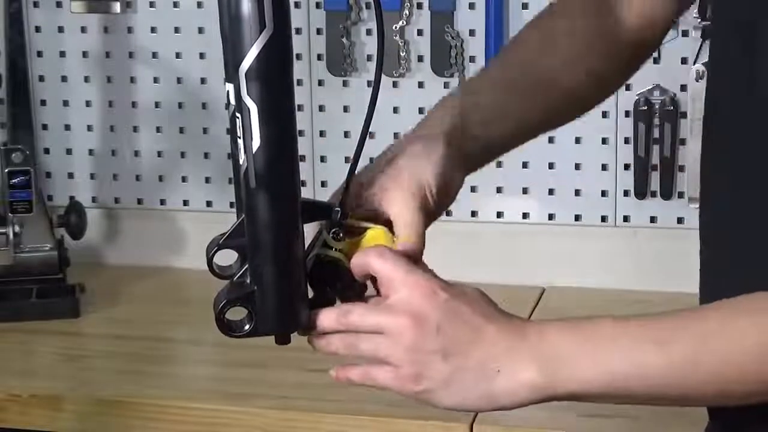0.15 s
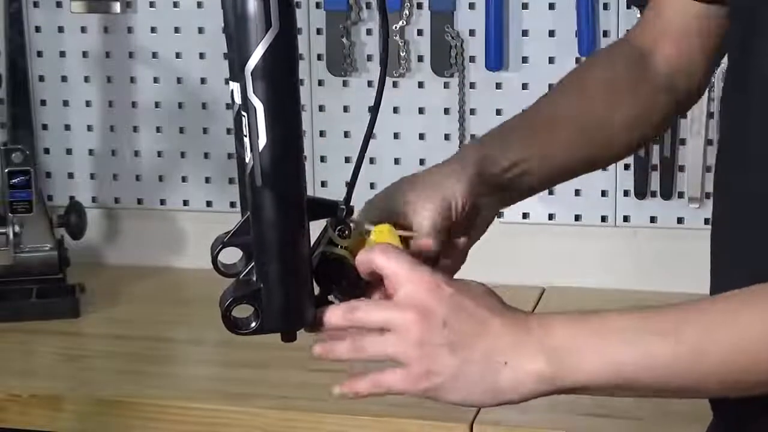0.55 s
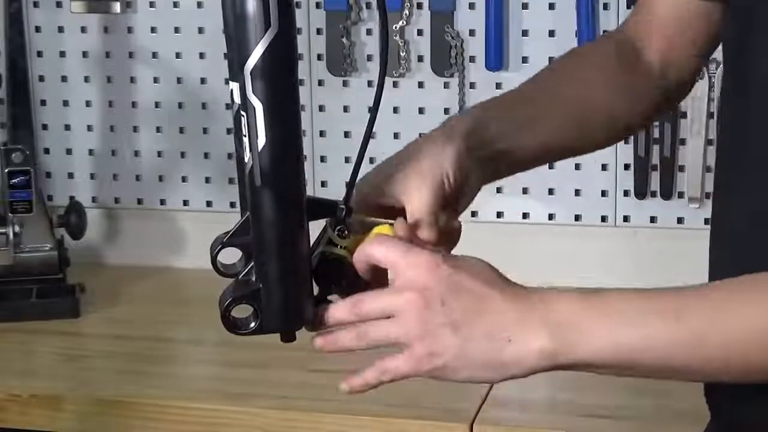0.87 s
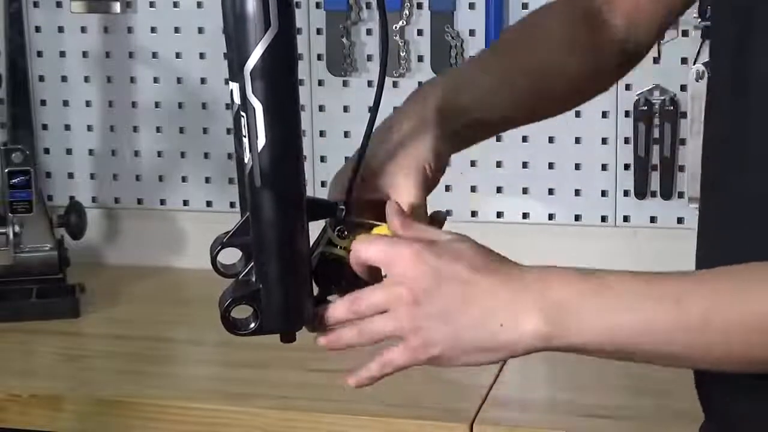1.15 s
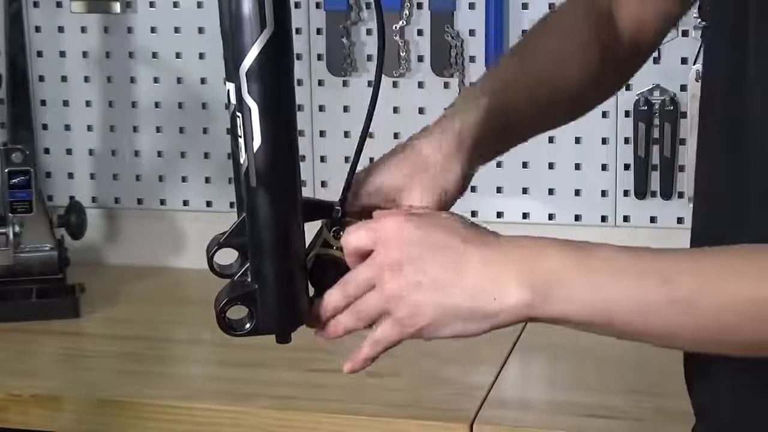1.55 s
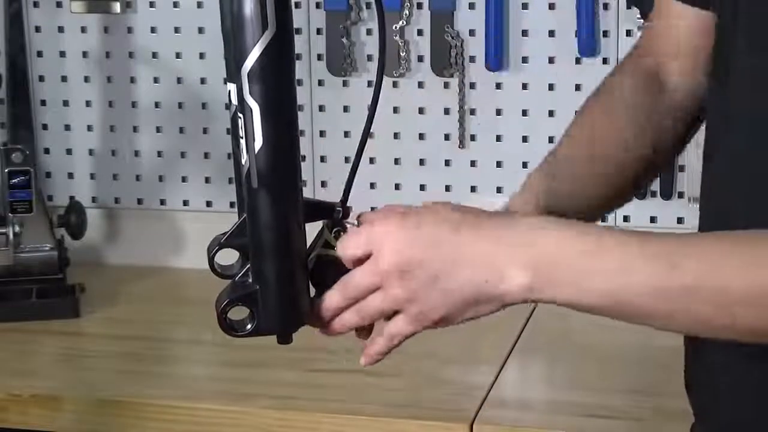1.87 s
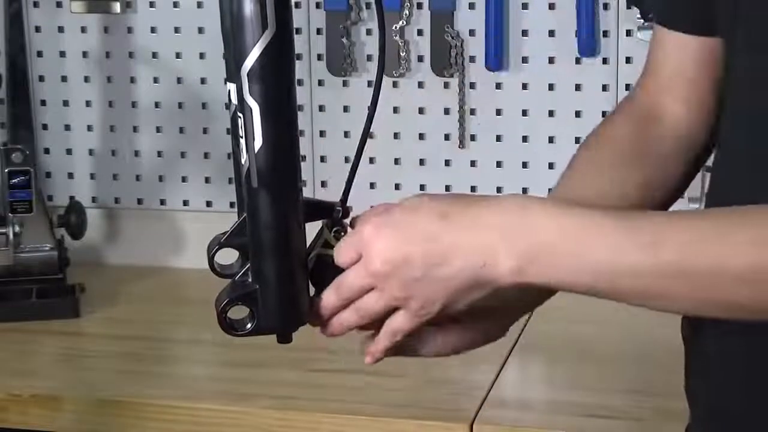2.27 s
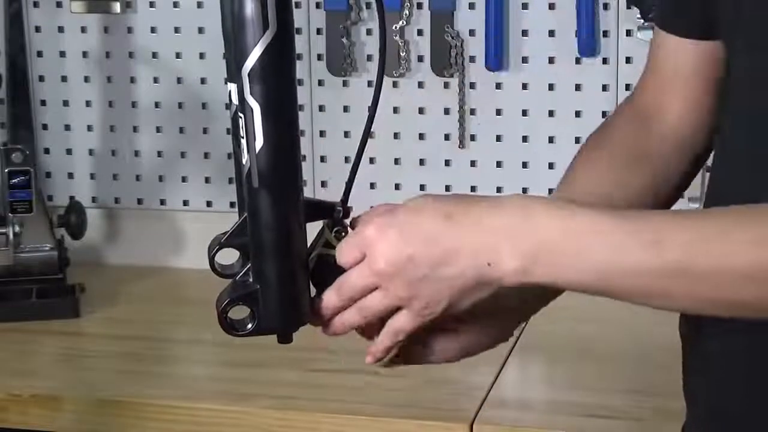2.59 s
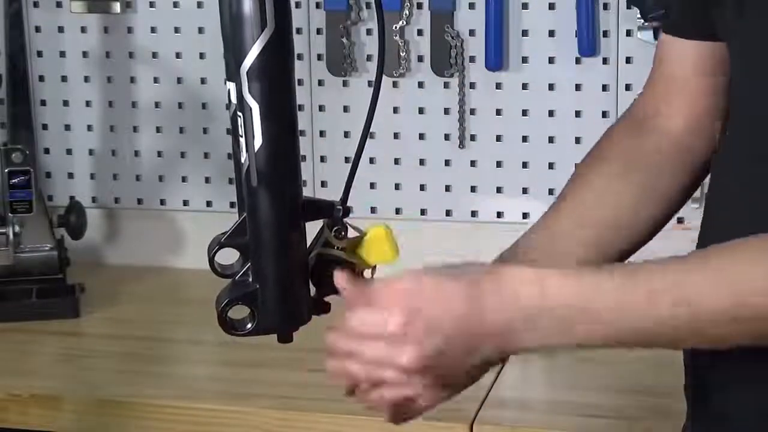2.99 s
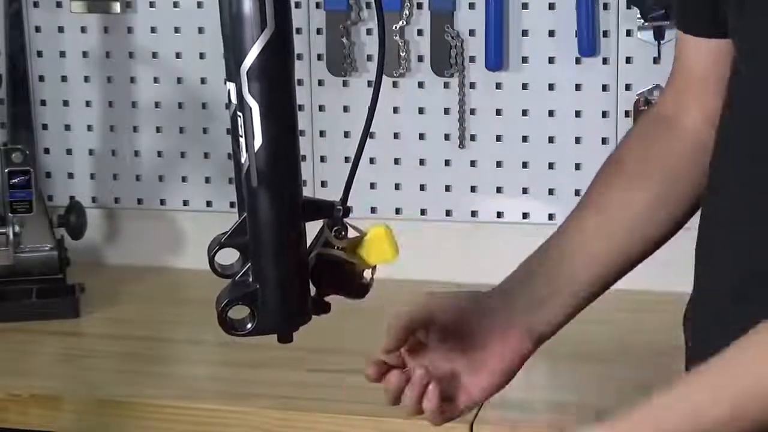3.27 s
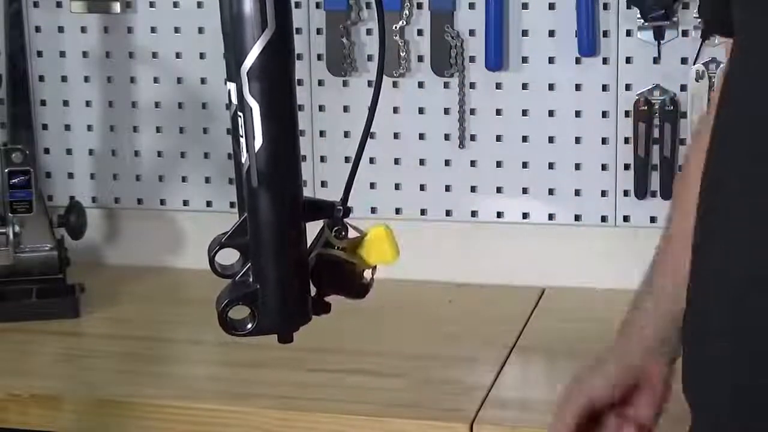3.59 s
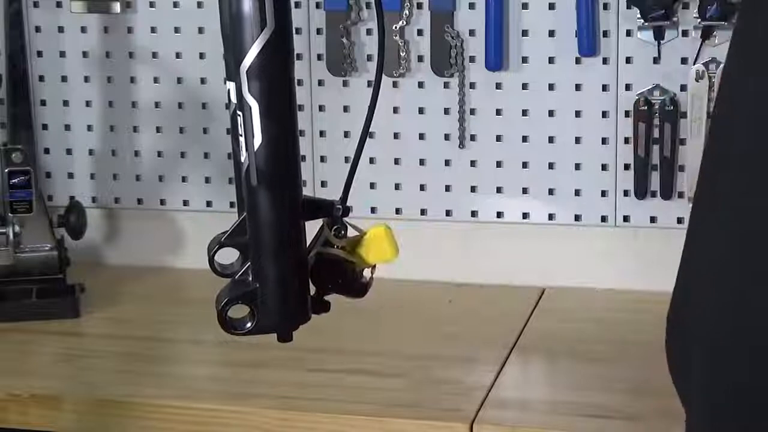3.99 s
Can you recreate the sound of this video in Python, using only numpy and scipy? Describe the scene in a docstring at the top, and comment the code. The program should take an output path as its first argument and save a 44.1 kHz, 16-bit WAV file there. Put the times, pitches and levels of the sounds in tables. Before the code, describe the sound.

Stretched rubber band snaps sharply against a bicycle brake caliper in a bare echoing workshop, with faint rubbing, then a dull footstep and clothing swish.

```python
"""A bare, echoing workshop, heard through a camera's two microphones.
A rubber band stretched round a plastic block on a bicycle brake caliper is pushed along by fingers:
it rasps, snaps and rebounds, each blow ringing the damped modes of block and caliper.
Late on, two faint whistles glide, a foot steps with a short squeak, and clothing swishes.
Under it lie filtered room noise, a low boom, a mains hum and the camera's ticks, hiss and thin whine."""
import sys
import numpy as np
from scipy import signal
from scipy.fft import rfft, irfft, next_fast_len
from scipy.io import wavfile
from scipy.ndimage import uniform_filter1d

SR = 44100
rng = np.random.default_rng(int(sys.argv[2]) if len(sys.argv) > 2 else 0)


def wav_out(sig):
    """Save sig, one row per channel (or a flat mono array), as 16-bit PCM at SR to the path in sys.argv[1]."""
    wavfile.write(sys.argv[1], SR, np.round(np.clip(np.atleast_2d(sig).T, -1, 1) * 32767).astype(np.int16))


N = 182441
TAPS = 4096  # length of one ring or blow, samples
EDGE_HZ = 11020  # upper band limit of the recorder

# snaps and slips of the band, and three faint dull ticks of the camera (0.941, 1.3596, 3.94):
# start_s, strength_db, brightness (dB per octave), room_send_db, place struck (lends the ticks its tone)
SNAPS = [ (0.2113, -13.5, 1.5, 3.5, "rim"), (0.2730, -5, -1.5, 3, "rim"), (0.6057, 0.5, -1.2, 5, "block"),
         (0.941, -28.5, -6, 3.5, "block"), (1.3596, -39, -8.5, -6, "block"),
         (1.9877, -26.5, -8.5, 3, "block"), (2.3568, -27, -4, 5.5, "rim"), (2.39, 2.5, 1, 4, "caliper"),
         (2.7739, -18, 9.5, 7, "underside"), (2.8204, -11.5, 7.5, -3, "underside"),
         (2.831, -14.5, -3, 6, "underside"), (2.9220, -13.5, 2, 2.5, "rim"),
         (3.94, -31, -8.5, -14, "block"), ]
# delay of the single bounce, and its level under the snap on most places and on bare metal
REBOUND_S, REBOUND_DB, METAL_REBOUND_DB = .0055, -14, -5.5


def snaps_and_dull_ticks(spread_s=0.001424):
    """The band strikes and rebounds once, harder off singing bare metal; dull camera ticks share the ring."""
    out = np.zeros((2, N))
    hz = np.fft.rfftfreq(TAPS, 1 / SR)
    # the blow travels through the parts, and its treble leaves last
    lag_s = spread_s * np.minimum(hz / EDGE_HZ, 1)
    dispersion = np.exp(-2j * np.pi * np.cumsum(lag_s) * SR / TAPS)
    for s, db, bright_db, send_db, place in SNAPS:
        blow = irfft(rfft(strike(place, bright_db)) * dispersion)
        click = gain_of(db) * blow
        on_metal = place == "caliper"
        rebound_db = METAL_REBOUND_DB if on_metal else REBOUND_DB
        add(out, s, in_room(click, send_db))
        add(out, s + REBOUND_S, gain_of(rebound_db) * in_room(click, send_db))
        if on_metal:
            add(out, s, gain_of(db) * singing())
    return out


# resonances of block and caliper; how strongly each rings depends on the place struck:
# pitch_hz, half_width_hz, then relative level_db at rim, block, caliper, underside
BRAKE_MODES = [ (540, 75, -5.5, -12, -14, -10), (957, 295, -7.5, -20, -16, -3),
               (1327, 113, 5, -12, -32, 4.5), (1680, 183, -17, -18.5, -9, -5.5),
               (2130, 300, 3.5, -15, -9.5, 5), (2660, 240, 1, -3, -18, 2), (3320, 560, 2, -37, -13, 1),
               (4127, 390, 5.5, -5, -11.5, -3.5), (4724, 214, 2, -6, -2, 0.5),
               (5130, 160, 6.5, -1.5, -4, -14), (5824, 640, 3.5, 1, -15.5, 0.5),
               (6060, 170, -9, -0.5, -11, -25), (6750, 210, -20, -8, 4, -1), (7240, 77, -3, -26, -0.5, 0),
               (8000, 470, -8, -6.5, -9, -4.5), (8850, 290, 2, -4, -13, -10), (9450, 370, -16, 3, -8.5, -3),
               (11800, 2900, -10.5, -12.5, -10, -6.5), ]
# names of the places struck, in the order of those level columns
PLACES = ["rim", "block", "caliper", "underside"]


def strike(place, bright_db):
    """The short ring of block and caliper when struck at one place; a sharper blow is brighter."""
    hz = np.fft.rfftfreq(TAPS, 1 / SR)
    octaves = np.log2(np.maximum(hz, 400) / 5000)  # the tilt pivots at 5 kHz
    column = PLACES.index(place)
    modes = [(f, width, levels_db[column]) for f, width, *levels_db in BRAKE_MODES]
    return ring(resonances(modes, hz) * gain_of(bright_db * octaves))


# lingering tones of the caliper's metal: pitch_hz, level_db relative to the blow, t60_s
SINGING = [(1695, -58, 1.2), (4880, -50, 0.91), (6738, -41, 0.96), (6550, -46, 0.78), (7200, -56, 0.51),
           (7600, -57, 0.39), (7412, -52, .5)]


def singing():
    """Thin, slowly dying tones of the caliper's metal after a blow on it."""
    t = np.arange(SR) / SR
    return sum(gain_of(db - 60 * t / t60) * np.sin(2 * np.pi * hz * t) for hz, db, t60 in SINGING)


# bursts of tiny slips as the band drags over an edge:
# start_s, length_s, strength_db, brightness (dB per octave)
RASPS = [(1.656, 0.02, -27, 3), (1.98, 0.015, -24, -3), (2.02, .045, -32.5, -7), (2.810, 0.02, -10.5, 2)]


def rasps(slips_per_s=2500, send_db=1):
    """Stretched rubber sticks and slips along the caliper's underside, each slip striking its modes."""
    out = np.zeros((2, N))
    t = np.arange(TAPS) / SR
    for s, length_s, db, bright_db in RASPS:
        slips = rng.standard_normal(TAPS) * (rng.random(TAPS) < slips_per_s / SR)
        swell = np.sin(np.pi * np.minimum(t / length_s, 1))
        slips *= np.sqrt(np.maximum(swell, 0))
        slips /= np.linalg.norm(slips) + 1e-9
        sound = signal.fftconvolve(slips, strike("underside", bright_db))
        add(out, s, gain_of(db) * in_room(sound, send_db))
    return out


# fingers pushing the band along: time_s of the hardest push, level_db
PUSHES = [(.83, -62), (2.1, -61), (2.87, -57.5)]
PUSH_RISE_DB_PER_S, PUSH_FALL_DB_PER_S = 27, 31
HOLD_DB = -63  # rubbing of the fingers between pushes
# tone of skin rubbing on rubber and plastic: pitch_hz, relative level_db (per Hz)
SKIN = [(40, 0), (100, -7.5), (220, 4.5), (500, 3.5), (1200, -1), (3000, -7.5), (11000, -59)]


def grip():
    """Strength of the fingers' rubbing: a steady hold, and a swell that builds and relaxes per push."""
    t = np.arange(N) / SR
    power = gain_of(HOLD_DB) ** 2
    for s, db in PUSHES:
        fade_db = np.maximum(PUSH_RISE_DB_PER_S * (s - t), PUSH_FALL_DB_PER_S * (t - s))
        power = power + gain_of(db - fade_db) ** 2
    return np.sqrt(power)


def friction(stroke, spectrum, grain_db):
    """Rubbing noise that catches and slides unevenly under a stroke."""
    catches = evened(uniform_filter1d(rng.standard_normal(N), size=200))
    return stroke * evened(hiss(spectrum) * gain_of(grain_db * catches))


# hands bumping softly against the fork: start_s, strength_db
BUMPS = [(2.152, -30), (2.225, -30), (2.255, -28)]
# the fork's dull resonance: pitch_hz, half_width_hz, relative level_db
BUMP_MODES = [(177, 51.6, 0)]
# the floor under the foot: pitch_hz, half_width_hz, relative level_db
STEP_MODES = [(275, 40, 0.5), (353, 117, 0), (428, 50, -3.2), (560, 110, -12)]


def knocks(rows, modes, room_db):
    """Soft blows on a heavily damped body, each ringing its low modes."""
    out = np.zeros((2, N))
    knock = ring(resonances(modes, np.fft.rfftfreq(TAPS, 1 / SR)))
    for s, db in rows:
        add(out, s, gain_of(db) * in_room(knock, room_db))
    return out


# one dull step: start, length of the roll, level midway, and level of its ends relative to that
STEP_S, STEP_ROLL_S, STEP_DB, STEP_ENDS_DB = 3.707, .056, -23, -3


def foot_roll(count=5, jitter_s=0.001):
    """The foot rolls from heel to sole in a quick run of knocks, heaviest midway: start_s, level_db."""
    roll = np.linspace(0, 1, count)
    times = STEP_S + STEP_ROLL_S * roll + jitter_s * rng.standard_normal(count)
    return zip(times, STEP_DB + STEP_ENDS_DB * (2 * roll - 1) ** 2)


# squeak of the sole: middle_s, half_length_s, pitch_hz, peak level_db
SQUEAK = (3.913, .012, 1030, -50)


def squeak():
    """The sole sticks and slips: one short sine under a bell-shaped swell."""
    s, half_s, pitch_hz, db = SQUEAK
    out = np.zeros((2, N))
    t = np.arange(-TAPS / 2, TAPS / 2) / SR
    swell = np.exp(-(t / half_s) ** 2)
    tone = in_room(swell * np.sin(2 * np.pi * pitch_hz * t), send_db=-4)
    add(out, s + t[0], gain_of(db) * tone / abs(tone).max())
    return out


# sleeves and trousers stir faintly all the time and brush once with the step
STIR_DB = -66
SWISH_S, SWISH_HOLD_S, SWISH_DB = 3.815, 0.039, -50.5
SWISH_RISE_DB_PER_S, SWISH_FALL_DB_PER_S = 183, 38
# tone of the cloth: pitch_hz, relative level_db (per Hz)
CLOTH = [(100, -56), (300, 6), (700, 6), (1300, 2.5), (2200, 3.5), (3500, 1), (5000, 1.5), (6800, 3.5),
         (9000, 2), (11000, -1)]


def swish():
    """Strength of the cloth's brushing: a faint stir, and one stroke that rises fast, holds and dies."""
    t = np.arange(N) / SR - SWISH_S
    rise_db = SWISH_RISE_DB_PER_S * np.maximum(-t, 0)
    fall_db = SWISH_FALL_DB_PER_S * np.maximum(t - SWISH_HOLD_S, 0)
    return np.hypot(gain_of(STIR_DB), gain_of(SWISH_DB - rise_db - fall_db))


# two thin whistles around the step: time_s of the highest pitch, highest pitch_hz, level_db
WHISTLES = [(3.71, 8950, -72), (3.65, 10330, -69.5)]
# their loudest moment, half length, drop in pitch one half length from the top, and unsteadiness
WHISTLE_S, WHISTLE_HALF_S, WHISTLE_SAG_HZ, WHISTLE_WAVER_HZ = 3.62, .14, 500, 50


def whistles(flutter_db=4):
    """Faint sines that swell, flutter and fade while their wavering pitch arches."""
    t = np.arange(N) / SR
    out = np.zeros(N)
    for s, top_hz, db in WHISTLES:
        slow = uniform_filter1d(rng.standard_normal((2, N)), size=600)
        flutter, waver = evened(uniform_filter1d(slow, size=300))
        sag_hz = WHISTLE_SAG_HZ * ((t - s) / WHISTLE_HALF_S) ** 2
        hz = np.maximum(top_hz - sag_hz + WHISTLE_WAVER_HZ * waver, 0)
        out += gain_of(db + flutter_db * flutter) * np.sin(2 * np.pi * np.cumsum(hz) / SR)
    return out * np.exp(-((t - WHISTLE_S) / WHISTLE_HALF_S) ** 2)


# the camera's mechanism, close to the microphones: pitch_hz, half_width_hz, relative level_db
TICK_MODES = [(2490, 85, -5.5), (2880, 68, -9.5)]
TICK_START_S, TICK_PERIOD_S, TICK_DB = .0325, .04, -42
# a soft broad hiss near 4.2 kHz and one thin whine at 7.6 kHz: pitch_hz, half_width_hz, relative level_db
CAMERA_NOISE = [(4200, 380, 0.73), (7630, 13, -1.7)]
CAMERA_NOISE_DB = -72


def camera(uneven_db=2.0):
    """The mechanism ticks regularly but unevenly loud, over a soft broad hiss and one thin whine."""
    out = np.zeros((2, N))
    tick = ring(resonances(TICK_MODES, np.fft.rfftfreq(TAPS, 1 / SR)))
    for s in np.arange(TICK_START_S, N / SR, TICK_PERIOD_S):
        add(out, s, gain_of(TICK_DB + uneven_db * rng.standard_normal()) * tick)
    return out + gain_of(CAMERA_NOISE_DB) * drone(CAMERA_NOISE)


# still air of the workshop: pitch_hz, relative level_db (per Hz)
AIR = [(25, -87), (60, -90), (100, -87), (240, -88), (400, -93), (700, -96), (1500, -100), (2500, -100),
       (3400, -105), (6000, -106.5), (9500, -110), (11000, -114)]
# boom of the room's lowest resonances: pitch_hz, half_width_hz, relative level_db
BOOM = [(54, 1.7, -9), (88, 17.4, -6.5), (102.3, 1.5, 4), (147, 43, -9.5), (235, 49, -11)]
AIR_DB, BOOM_DB = -65, -62.5
HUM_HZ, HUM_DB = 100, -69


def workshop():
    """Room noise, its low boom, and the mains hum as a plain sine."""
    hum = evened(np.sin(2 * np.pi * HUM_HZ * np.arange(N) / SR))
    return gain_of(AIR_DB) * hiss(AIR) + gain_of(BOOM_DB) * drone(BOOM) + gain_of(HUM_DB) * hum


# echoes from bench, pegboard and near walls: delay_s, level_db, lean_db (left over right)
ECHOES = [(.0013, -12, 7), (.0034, -20, -22), (.0066, -17.5, 12), (.0108, -12.5, -12), (.0145, -30, -14),
          (.0175, -21, 15)]
# how long the room rings: pitch_hz, t60_s
ROOM_T60 = [(150, 0.9), (500, 1), (1400, 1), (2700, 0.9), (4200, 0.75), (6000, 0.77), (8000, 0.73),
            (11000, 0.54)]


def in_room(sound, send_db, build_s=0.00086, scatter_db=-3, scatter_s=0.0059, echo_share=0.28):
    """Direct sound, scatter from fork and hands, near echoes, and a tail that dies soonest in the treble."""
    hz, t, z = signal.stft(diffuse(np.ones_like, size=49152), SR, nperseg=256)
    decay_db = -60 * t / read(ROOM_T60, hz)[:, None]
    tail = signal.istft(z * gain_of(decay_db), SR, nperseg=256)[1]
    tail *= 1 - np.exp(-np.arange(tail.shape[1]) / (SR * build_s))
    # scatter comes from straight ahead, so both microphones hear the same
    scatter = rng.standard_normal(TAPS) * np.exp(-np.arange(TAPS) / (SR * scatter_s))
    near = gain_of(scatter_db) * np.array([scatter, scatter]) / np.linalg.norm(scatter)
    for delay_s, db, lean_db in ECHOES:
        moved = 1 + .08 * rng.standard_normal()  # hands and arms shift the paths
        add(near, delay_s * moved, gain_of(db + np.array([[lean_db], [-lean_db]]) / 2))
    # the near echoes feed the room as well, which combs its tail
    fed = signal.fftconvolve(tail, near.mean(0)[None], axes=1)[:, :tail.shape[1]]
    tail = tail + echo_share * fed
    paths = gain_of(send_db) * tail / np.linalg.norm(tail[0])
    paths[:, 0] += 1  # the direct sound
    add(paths, 0, near)
    return signal.fftconvolve(sound[None], paths, axes=1)


# likeness of diffuse sound at the two microphones: pitch_hz, correlation (1 = identical)
ROOM_LIKENESS = [(100, .97), (300, .86), (600, .69), (1500, .76), (5000, .82), (11000, .85)]


def diffuse(colour, size):
    """Stereo noise arriving from all round the room; colour gives the gain at each frequency."""
    hz = np.fft.rfftfreq(size, 1 / SR)
    mid, side = rfft(rng.standard_normal((2, size)))
    same = np.clip(read(ROOM_LIKENESS, hz), -1, 1)
    mid, side = mid * np.sqrt(1 + same), side * np.sqrt(1 - same)
    return evened(irfft(np.array([mid + side, mid - side]) * colour(hz), size))


def hiss(spectrum):
    """Steady diffuse noise with a spectrum of pitch_hz, level_db rows."""
    return diffuse(lambda hz: gain_of(read(spectrum, hz)), next_fast_len(N))[:, :N]


def drone(modes):
    """Steady diffuse noise held in a few resonances."""
    return diffuse(lambda hz: resonances(modes, hz), next_fast_len(N))[:, :N]


def resonances(modes, hz):
    """Gain of a set of damped modes whose powers add."""
    gains = [gain_of(db) / (1 + ((hz - f) / width) ** 2) for f, width, db in modes]
    return np.sqrt(sum(gain ** 2 for gain in gains))


RADIATION_HZ = 216  # small bodies radiate poorly below this


def ring(gain):
    """Causal (minimum-phase) response of energy 1, shaped by the given gain and by radiation."""
    hz = np.fft.rfftfreq(TAPS, 1 / SR)
    radiated = gain * hz ** 2 / (hz ** 2 + RADIATION_HZ ** 2)
    log_gain = np.log(np.maximum(radiated / radiated.max(), 1e-4))
    circle = np.r_[log_gain, log_gain[-2:0:-1]]
    response = np.fft.ifft(np.exp(np.conj(signal.hilbert(circle)))).real
    return response / np.linalg.norm(response)


def gain_of(db):
    """Decibels to amplitude."""
    return 10 ** (np.asarray(db) / 20)


def evened(x):
    """Scales to an rms of 1."""
    return x / np.sqrt(np.mean(x ** 2) + 1e-20)


def read(points, hz):
    """Reads a table along a logarithmic frequency axis."""
    f, value = np.transpose(points)
    return np.interp(np.log(hz + 1), np.log(f + 1), value)


def add(mix, s, sound):
    """Mixes a sound into both channels from time s."""
    part = mix[:, max(round(s * SR), 0):][:, :sound.shape[-1]]
    part += sound[..., :part.shape[1]]


def scene():
    """Everything as it reaches the camera's two microphones."""
    blows = snaps_and_dull_ticks() + rasps() + knocks(BUMPS, BUMP_MODES, room_db=-1)
    rubbing = friction(grip(), SKIN, grain_db=-0.5) + friction(swish(), CLOTH, grain_db=0.5)
    footstep = knocks(foot_roll(count=5), STEP_MODES, room_db=0.5) + squeak()
    return blows + rubbing + footstep + whistles() + camera() + workshop()


def record(dry):
    """The recorder's steep band limit, a linear-phase low-pass."""
    low_pass = signal.firwin(511, EDGE_HZ, window=("kaiser", 8), fs=SR)
    return signal.oaconvolve(dry, low_pass[None], "same", axes=1)


dry = scene()
out = record(dry)
wav_out(out)
```